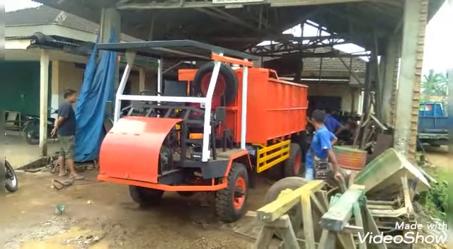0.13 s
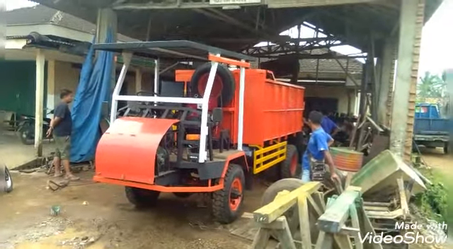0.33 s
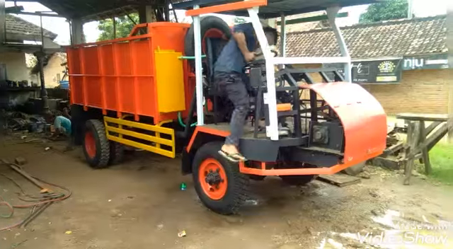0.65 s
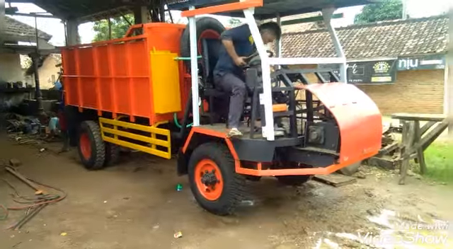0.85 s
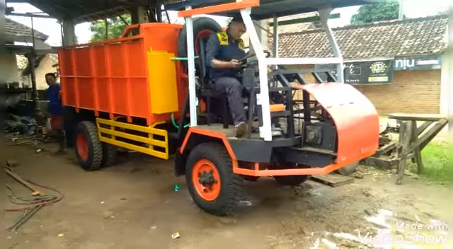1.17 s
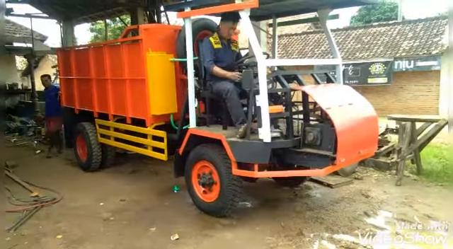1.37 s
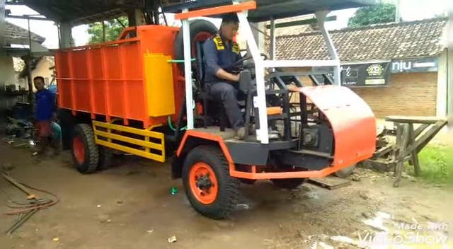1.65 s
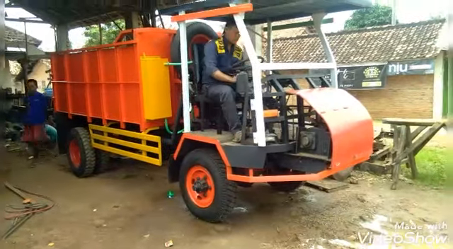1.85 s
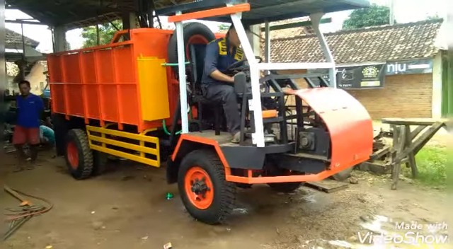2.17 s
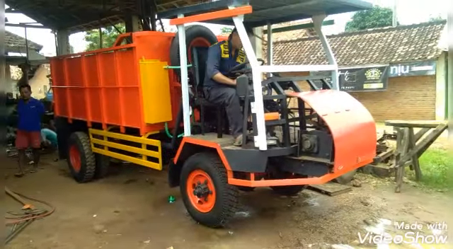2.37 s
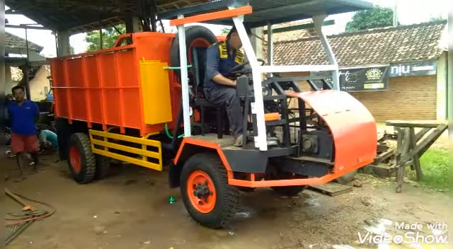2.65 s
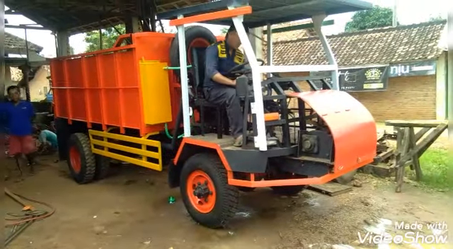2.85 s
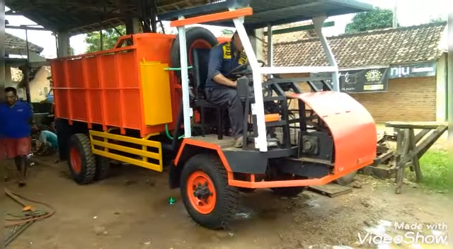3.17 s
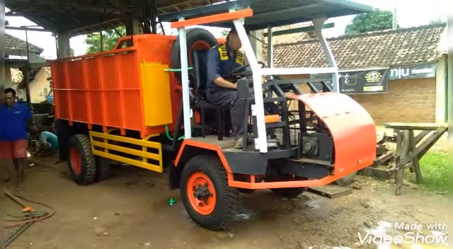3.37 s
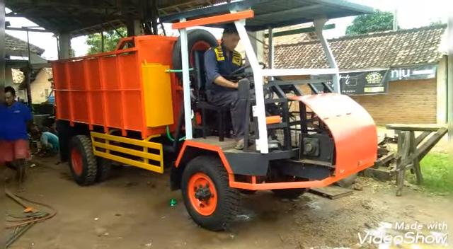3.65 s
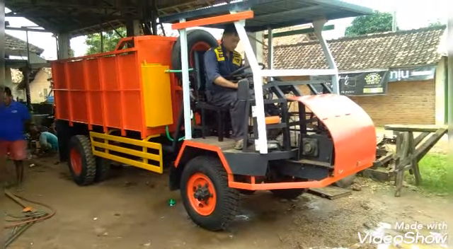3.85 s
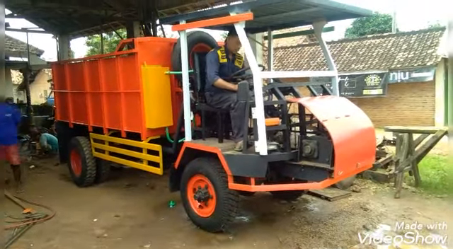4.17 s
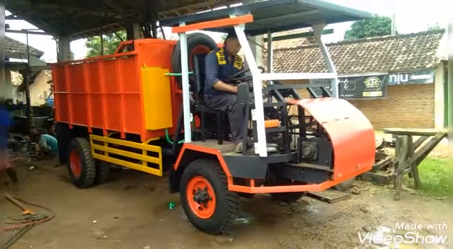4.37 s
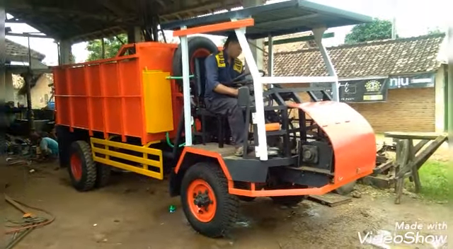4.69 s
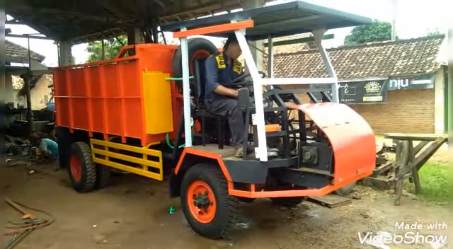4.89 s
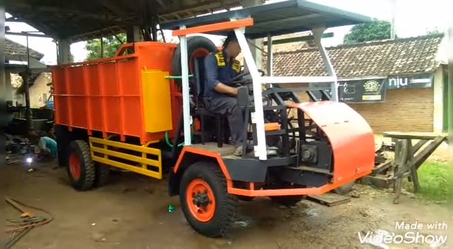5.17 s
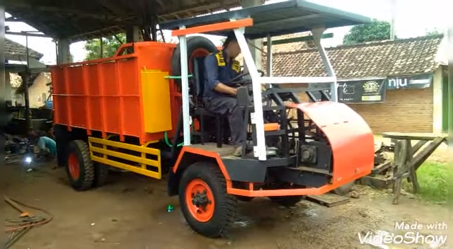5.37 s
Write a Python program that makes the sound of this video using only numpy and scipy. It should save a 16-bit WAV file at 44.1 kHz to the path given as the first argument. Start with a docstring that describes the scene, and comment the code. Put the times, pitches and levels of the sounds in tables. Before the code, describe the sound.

From 0 to 0.47 s, a low, lumpy yard rumble is heard, with dull thuds around 0.06 and 0.11 s and a steel part clanging at 0.16 s, bouncing to about 0.3 s with a rough crash and short ring. It fades quickly into complete silence until about 1.0 s. A small diesel engine then fades in, chugging softly and unevenly at about 31-35 firings per second, with very faint metallic ticks and a faint hiss. From 2 s it speeds up with small surges; after 2.5 s the exhaust bark hardens and clatter grows, reaching a loud, knocking roar at about 53 firings per second near 4.65 s. Grainy rattles come at 4.05, 4.6 and 4.75 s. The pedal lifts at 4.77 s: the bark collapses and the engine coasts down in a hollow pipe hum with fine ticking. Near 5.45 s a sharper metal rattle rings as it nears idle. The sound is thin, with short workshop reflections.

```python
"""Small diesel truck in an open workshop

Two scenes. First a short yard rumble (shaped noise) with dull thuds and one clang of steel (dying sines
with a noise crash), fading to silence. Then the engine fades in at idle, is revved up under a hardening
exhaust bark, coasts back and settles. Every firing sends a pulse down the pipe and knocks the block;
loose metal rattles at set times as short grainy noise bursts, with one slow hiss swell.
"""
import sys
import numpy as np
from scipy import signal
from scipy.fft import rfft, irfft
from scipy.io import wavfile
from scipy.ndimage import uniform_filter1d

SR = 44100
rng = np.random.default_rng(int(sys.argv[2]) if len(sys.argv) > 2 else 0)


def dump_mix(stems):
    """Bounce the given channels to the path in sys.argv[1] as a 16-bit WAV at rate SR."""
    frames = np.atleast_2d(stems).T  # one column per channel
    limited = np.clip(frames, -1, 1)  # hard clip at full scale
    pcm = np.round(limited * 32767).astype(np.int16)
    wavfile.write(sys.argv[1], SR, pcm)


N = 243873
T = np.arange(N) / SR  # time/s


def amp(db):
    """Level law: decibels to amplitude gain."""
    return 10 ** (np.asarray(db) / 20)


def evened(x, size=0):
    """Power normalisation: rms 1 overall, or by a running mean power over size samples, taken twice."""
    if size:
        power = uniform_filter1d(uniform_filter1d(x ** 2, size), size)
    else:
        power = np.mean(x ** 2)
    return x / np.sqrt(abs(power) + 1e-12)


def noise(points, tilt_db=0):
    """Spectral shaping: Gaussian noise of rms 1, its spectrum tilted by tilt_db per octave about 4 kHz."""
    octave = np.log2(np.fft.rfftfreq(N, 1 / SR) + 1)
    f, db = np.transpose(points)
    spectrum_db = np.interp(octave, np.log2(f + 1), db)
    gain = amp(spectrum_db + tilt_db * (octave - np.log2(4000)))
    return evened(irfft(rfft(rng.standard_normal(N)) * gain, N))


def ring(modes, rise):
    """Modal decay: each mode is a dying sine; all share a soft start of time constant rise (s)."""
    t = T[:SR // 2]
    sines = sum(amp(db - 60 * t / t60) * np.sin(2 * np.pi * hz * t) for hz, db, t60 in modes)
    return (1 - np.exp(-t / rise)) * sines


def played(train, shape, early):
    """Convolution: one copy of shape for each impulse, starting early (s) before it."""
    return signal.oaconvolve(train, shape)[round(early * SR):][:N]


def shed(x, t60, delay):
    """Reverberation of roof and walls: sparse reflections of random sign, dying away exponentially."""
    t = T[:SR // 5]
    signs = rng.choice([-1., 1.], len(t))
    present = rng.random(len(t)) < 1500 / SR  # 1500 taps per s on average
    taps = signs * present * amp(-60 * t / t60) * (t > delay)
    return signal.oaconvolve(x, taps / np.linalg.norm(taps))[:N]


def resonate(x, hz, width):
    """Heterodyne resonance: shift the moving pitch hz to zero, low-pass, shift back; width in Hz."""
    carrier = np.exp(2j * np.pi * np.cumsum(hz) / SR)
    pole = np.exp(-np.pi * width / SR)
    return (carrier * signal.lfilter([1], [1, -pole], x / carrier)).real


def pings(at, low_hz, span, decay, spread_db):
    """Impact resonance: a few cycles per firing; pitch drifts as other parts take the blow."""
    out, t = np.zeros(N + 400), T[:400]
    size, jump, drift = rng.random((len(at), 3)).T
    slow = evened(uniform_filter1d(drift - .5, 7))
    pitch = np.clip(.5 + 0.236 * slow + .5 * (jump - .5), 0, 1)
    envelope = (1 - np.exp(-t / .0004)) * np.exp(-t / decay)
    for n, gain, hz in zip(at, amp(spread_db * size), low_hz * span ** pitch):
        out[n:n + 400] += gain * envelope * np.sin(2 * np.pi * hz * t)
    return evened(out[:N], size=8000)


def steel_clang(at_level):
    """Modal impact: a steel part is struck and bounces; each bounce stops the ring before it."""
    # blows: t/s, ring level/dB, crash level/dB
    blows = [(.158, -22.5, -16.5), (0.196, -18, -18), (0.255, -21.5, -29), (0.307, -27.5, -36)]
    # modes of the steel: f/Hz, relative level/dB, t60/s
    steel_modes = [(898, -19, 0.58), (1165, -5.5, 1), (1249, 3, 0.2), (1470, -8, .3), (1620, -12, .2),
                   (1740, -7, .15), (1980, -12, 0.16), (2706, -18.5, 0.41), (2990, -21, .4),
                   (3800, -25.5, 0.46)]
    # crash spectrum: f/Hz, relative level/dB per Hz
    crash_spectrum = [(290, -50.5), (500, -18.5), (827, -23.5), (1240, -5), (1370, -12.5), (1990, -12.5),
                      (3590, -27.5), (8510, -41.5), (15600, -63)]
    steel, t = np.zeros(N), T[:SR // 2]
    hiss = noise(crash_spectrum)
    for s, ring_db, crash_db in blows:
        at = round(s * SR)
        crash = amp(crash_db - 60 * t / 0.45) * hiss[at:at + len(t)]
        steel[at:at + len(t)] = amp(ring_db) * ring(steel_modes, .0004) + crash  # replaces the last ring
    return at_level * steel


def thuds():
    """Heavily damped mode: dull steps or bumps as short low sines, starting with a negative swing."""
    # thuds: t/s, level/dB
    thud_times = [(.056, -22), (.11, -25), (.118, -20.5)]
    out = np.zeros(N)
    for s, db in thud_times:
        out[round(s * SR):][:SR // 2] -= ring([(205, db, 0.02)], .0005)
    return out


def yard():
    """Superposition: lumpy broadband rumble of the workshop, the clang and the thuds."""
    # rumble spectrum: f/Hz, relative level/dB per Hz
    yard_spectrum = [(18, -64.5), (30, -20.5), (97, 3), (182, -16), (256, -4), (360, -15.5), (675, -17),
                     (1110, -15.5), (2310, -20.5), (4000, -38), (8540, -44), (11000, -53.5), (15600, -71.5)]
    # rumble level: t/s, level/dB
    yard_level = [(0, -31.5), (.15, -35), (.3, -34), (.4, -33), (.44, -44), (.46, -52.5), (.468, -77)]
    lumps = evened(uniform_filter1d(rng.standard_normal(N), 900))
    level_db = np.interp(T, *np.transpose(yard_level))
    rumble = amp(level_db + 0.5 * lumps) * noise(yard_spectrum)
    clang = steel_clang(amp(level_db - yard_level[0][1]))  # fades along with the rumble
    return rumble + clang + thuds()


def rattles():
    """Decaying noise: short grainy bursts of loose metal at set times, with one slow hiss swell."""
    # bursts: t/s, level/dB, rise time constant/s, t60/s, spectral tilt/dB per octave
    bursts = [(1.275, -53, 0.0025, 0.17, 6), (1.39, -46, 0.0089, 0.15, 6), (1.52, -56, .08, 1.2, 8),
              (1.59, -53, .002, .1, 6), (1.63, -51, .002, .1, 5), (1.72, -50, 0.0026, .1, 8),
              (1.8, -50, .002, 0.13, 7), (1.85, -51, .01, .35, 8), (4.045, -25.5, 0.0065, 0.55, 1.5),
              (4.625, -24.5, 0.002, 0.23, 2), (4.74, -28.5, 0.0016, 0.25, 5), (5.435, -28, 0.0096, 0.35, 3),
              (5.467, -18.5, 0.0036, 0.49, -7.5), (5.45, -20, 0.0066, 0.26, 3.5)]
    # burst spectrum before the tilt: f/Hz, relative level/dB per Hz
    rattle_spectrum = [(350, -40), (600, -5), (855, 2), (1240, -4), (2070, 0), (2250, -1), (4760, -8),
                       (5460, -15), (8550, -15), (15600, -48)]
    # parts left ringing: f/Hz, level/dB, t60/s
    loose_parts = [(860, -20.5, 0.2), (4680, -22, 0.095), (6440, -43, .1), (8500, -42, 0.2),
                   (13630, -44, 0.16)]
    out = np.zeros(N)
    for s, db, rise, t60, tilt_db in bursts:
        t = np.maximum(T - s, 0)
        out += amp(db - 60 * t / t60) * (1 - np.exp(-t / rise)) * noise(rattle_spectrum, tilt_db)
    hit = round(bursts[-1][0] * SR)  # the burst listed last, at 5.45 s, leaves a few parts ringing
    out[hit:] += ring(loose_parts, 0.0024)[:N - hit]
    return out


def firings():
    """Phase integration of engine speed: speed (firings per s), phase (firings) and firing samples."""
    # engine speed: t/s, firing rate f/Hz
    speed_curve = [(1.0, 30.67), (1.12, 33.69), (1.5, 32.13), (1.6, 34.73), (1.69, 31.62), (1.98, 34.25),
                   (2.32, 40.72), (2.57, 38.02), (2.7, 44.06), (2.81, 37.83), (2.94, 41.42), (3.3, 43.14),
                   (4.05, 49.24), (4.65, 53.42), (4.77, 52.28), (4.81, 49.84), (5.15, 42.8), (5.28, 37.3),
                   (5.38, 38.33), (5.53, 33.63)]
    speed = np.interp(T, *np.transpose(speed_curve))
    phase = np.cumsum(speed * (T >= 1)) / SR - .4
    at = np.flatnonzero(np.diff(np.floor(phase))) + 1
    return speed, phase, at


def controls(speed):
    """Load dependence: levels of the engine layers from effort, speed and pedal."""
    # how hard the engine works: t/s, clatter level/dB, exhaust crack level/dB
    effort = [(1.02, -69, -72), (1.07, -58, -71.5), (1.2, -49.5, -70), (1.62, -47, -68), (1.78, -49, -60),
              (1.88, -45.5, -56), (2.0, -48.5, -60), (2.16, -48.5, -71), (2.45, -45, -41.5),
              (3.08, -40.5, -32), (3.4, -35.5, -25.5), (3.94, -30.5, -22), (4.3, -27.5, -20.5),
              (4.76, -26.5, -22), (4.82, -33.5, -30), (4.9, -33.5, -37), (5.15, -35.5, -50),
              (5.45, -36.5, -50)]
    # Voice under power: firing rate f/Hz, then boom, pipe ring, body ring (level/dB over the clatter),
    # gain of the clatter's treble/dB, whoosh (level/dB over the clatter),
    # valve tick (level/dB against the clatter before its treble gain)
    pulling = [(34.1, 7, 14, -1, -6, -10, -50), (38.1, 5, 10, 12, -7, -11, -45),
               (41.6, 13.6, 5.5, 9.5, -3.5, -10.5, -40), (43.8, 7.6, 8, 7.5, -3, -5, -43),
               (46.5, 14.2, 3, 6, -3.5, -7.5, -42), (47.9, 13.7, 9.5, 7.5, -4, -5.5, -38),
               (49.65, 7.9, -16, 9, -4.5, -1, -38), (50.9, 12.7, -14, 7.5, -12, -8.5, -36),
               (52.5, 9, -21, 7.5, -9.5, -2.5, -32)]
    # voice with the pedal let go: the same columns
    coasting = [(37.7, 10, 14.4, 10.6, -5, -2.5, -24), (40.8, 8, 14, 7.1, -3.5, 1, -22),
                (42.7, 4, 19.7, 7.1, -8, 1, -30), (48, 5, 17.8, 9.4, 1, -1, -42)]
    lift_s, shut_s = 4.77, 0.045  # the pedal is let go; time for the fuel to fall away
    s, *levels = np.transpose(effort)
    clatter_db, crack_db = (np.interp(T, s, c) for c in levels)
    shut = np.clip((T - lift_s) / shut_s, 0, 1)
    rates, *columns = np.transpose(pulling)
    pull = np.array([np.interp(speed, rates, c) for c in columns])
    rates, *columns = np.transpose(coasting)
    coast = np.array([np.interp(speed, rates, c) for c in columns])
    boom, pipe, body, treble_db, whoosh, tick_db = (1 - shut) * pull + shut * coast
    # the share of knock in the clatter grows with the crack; no fuel, little knock
    knock = np.clip(.022 * (crack_db + 45) * (1 - shut), .05, 1)
    return (clatter_db + boom, clatter_db + pipe, clatter_db + body, crack_db, clatter_db, treble_db,
            knock, clatter_db + whoosh, tick_db)


def frame_rumble(pipe_db, body_db, idling):
    """Forced vibration: low noise following pipe and body; at idle a little stronger beside them."""
    # rumble spectrum: f/Hz, relative level/dB per Hz
    rumble_spectrum = [(20, -7), (32, 30), (60, 30), (90, 2), (160, 23), (300, 21), (600, -25), (1200, -37),
                       (2000, -46.5)]
    return amp(.5 * (pipe_db + body_db) - 8 + 2 * idling) * noise(rumble_spectrum)


def whoosh_noise():
    """Broadband noise of rms 1 weighted below about 2.7 kHz."""
    # whoosh spectrum: f/Hz, relative level/dB per Hz
    whoosh_spectrum = [(500, -13), (1000, -4), (2000, -2.5), (2650, -9.5), (2900, -38), (5000, -35)]
    return noise(whoosh_spectrum)


def exhaust_roar(throb):
    """Amplitude modulation: mid-band noise throbbing at the firing rate."""
    return throb * noise([(200, -30), (450, 0), (1300, -3), (2000, -25), (4000, -50)])


def boom_tone(phase, at, strokes):
    """Engine-order tone: the second order of the firing; no two strokes push alike."""
    tone = -np.sqrt(2) * np.cos(4 * np.pi * phase)
    return tone * amp(1.5 * np.interp(T, at / SR, strokes))


def body_ring(blow_train):
    """Structural modes: each firing rings the body, and the workshop answers."""
    # body modes: f/Hz, relative level/dB, t60/s
    body_modes = [(259, 4.5, 0.026), (333, 8, 0.017), (410, -3.5, 0.019)]
    rings = played(blow_train, ring(body_modes, 0.00032), 0.0025)
    rings = rings + amp(-2) * shed(rings, t60=1.0, delay=.004)
    return evened(rings, size=8000)


def pipe_ring(pulse_train, blow_train, idling):
    """Pipe resonance: gas pulses and turbulence excite a moving mode, beside steady silencer modes."""
    # pitch of the moving mode: t/s, f/Hz
    pipe_pitch = [(1, 159), (1.4, 149.4), (1.62, 122), (1.78, 120), (1.9, 172), (2.04, 138), (2.5, 163),
                  (3.1, 137), (4.8, 156), (5.17, 132), (5.26, 181), (5.53, 164)]
    # steady rings of the silencer: f/Hz, relative level/dB, t60/s
    silencer_modes = [(106, -2, 0.076), (187.3, -1, 0.13)]
    pipe_hz = np.interp(T, *np.transpose(pipe_pitch))
    flutter = evened(resonate(rng.standard_normal(N), pipe_hz, width=30))  # turbulence in the slow gas
    soft = played(pulse_train, -np.hanning(130), 0.0018)  # inside the pipe the pulse has no sharp front
    thump = resonate(soft, pipe_hz, width=38)
    # the pipe mouth radiates little below its ring
    open_end = signal.butter(2, 80, "high", fs=SR, output="sos")
    thump = evened(signal.sosfiltfilt(open_end, thump), size=8000)
    silencer = evened(played(blow_train, -ring(silencer_modes, 0.00063), 0.0031))
    return evened(thump + .2 * idling * flutter + 0.67 * silencer, size=8000)


def knocks(at, bright):
    """Combustion knock: the block rings briefly inside a puff of noise."""
    # knock spectrum: f/Hz, relative level/dB per Hz
    knock_spectrum = [(1500, -40), (2500, 5), (3700, 7), (5400, -18), (8000, 4.5), (12000, -12.5),
                      (15600, -44)]
    # hard knock at top speed: f/Hz, relative level/dB per Hz
    snap_spectrum = [(1500, -16), (2500, 6), (4000, -7), (6500, 0), (10000, -17), (15600, -16)]
    train, t = np.zeros(N), T[:400]
    train[at] = amp(7 * rng.random(len(at)))
    puff_shape = (1 - np.exp(-t / 0.00089)) * np.exp(-t / 0.0025)
    puff = signal.oaconvolve(train, puff_shape)[:N]
    puff = puff * (noise(knock_spectrum) + bright * noise(snap_spectrum))
    block = pings(at, low_hz=2560, span=1.7, decay=.003, spread_db=9)
    return evened(evened(puff) + .85 * block, size=8000)


def engine_clatter(speed, at, throb, knock, treble_db, tick_db):
    """Mechanical impact noise: throbbing noise, combustion knock and valve tick, with a treble gain."""
    # clatter spectrum: f/Hz, relative level/dB per Hz
    clatter_spectrum = [(290, -2.5), (500, -1), (553, -8), (716, -0.5), (1090, -7), (1410, -10.5),
                        (2730, -7.5), (5610, -20.5), (8040, -16), (9280, -17.5), (11900, -39), (14900, -52),
                        (15600, -48)]
    # valve tick: firing rate f/Hz, lowest tick f/Hz
    tick_pitch = [(37, 12800), (44, 10800), (52, 11800)]
    firing_rate = SR / np.gradient(at)
    hardness = np.interp(firing_rate, [49, 53.5], [0, .9])  # the knock hardens at top speed
    bright = np.interp(T, at / SR, hardness)
    steady = np.sqrt(1 - np.clip(knock, 0, 1) ** 2) * throb * noise(clatter_spectrum)
    tick_hz = np.interp(speed[at], *np.transpose(tick_pitch))
    tick = pings(at, tick_hz, span=1.13, decay=.0008, spread_db=10)
    clatter = steady + knock * knocks(at, bright) + amp(tick_db) * tick
    treble = signal.sosfiltfilt(signal.butter(2, 5500, "high", fs=SR, output="sos"), clatter)
    return clatter + (amp(treble_db) - 1) * treble


def exhaust_crack(pulse_train):
    """Blow-down pulse: steep over-pressure, then suction, with ground and workshop reflections."""
    t = T[:500]
    front = np.exp(-t / 0.00036) * np.cos(2 * np.pi * 420 * t)
    front = signal.sosfilt(signal.cheby1(6, 3, 1450, fs=SR, output="sos"), front)
    front += amp(-11) * np.roll(front, round(.0062 * SR))  # thrown back by the ground
    crack = played(pulse_train, front, 0.002085)
    crack = crack + amp(-7) * shed(crack, t60=.25, delay=.004)
    return evened(crack, size=8000)


def engine():
    """Periodic excitation: the firing train drives exhaust, pipe, body, knock and clatter."""
    speed, phase, at = firings()
    (boom_db, pipe_db, body_db, crack_db, clatter_db, treble_db,
     knock, whoosh_db, tick_db) = controls(speed)
    uneven_db = np.interp(np.gradient(at) / SR, [.026, .03], [1, 2.3])  # slow firings differ most
    idling = np.interp(T, at / SR, uneven_db)
    chance = rng.standard_normal((len(at), 2))
    pulse_train, blow_train = np.zeros((2, N + SR // 10))
    pulse_train[at], blow_train[at] = amp(uneven_db * chance.T)
    throb = 1 + 0.13 * np.cos(2 * np.pi * (phase - .1))

    out = frame_rumble(pipe_db, body_db, idling)
    out += amp(whoosh_db) * whoosh_noise()
    out += amp(crack_db - 12) * exhaust_roar(throb)
    out += amp(boom_db) * boom_tone(phase, at, chance[:, 1])
    out += amp(body_db) * body_ring(blow_train)
    out += amp(pipe_db) * pipe_ring(pulse_train, blow_train, idling)
    out += amp(clatter_db) * engine_clatter(speed, at, throb, knock, treble_db, tick_db)
    out += amp(crack_db) * exhaust_crack(pulse_train)
    return out


def scene():
    """Time gating: the yard, then the engine with its rattles, with silence between them."""
    yard_end_s, engine_start_s = .468, 1.021
    first = yard() * (T < yard_end_s)
    second = (engine() + rattles()) * (T > engine_start_s)
    return (first + second)[None]


def record(dry):
    """Band limitation: the small microphone drops the deep bass; the recorder cuts the top."""
    mic_low_hz, edge_hz = 75, 15750
    high_pass = signal.butter(2, mic_low_hz, "high", fs=SR, output="sos")
    thin = signal.sosfiltfilt(high_pass, dry) * (dry != 0)  # the silence stays silent
    low_pass = signal.firwin(511, edge_hz, window=("kaiser", 9), fs=SR)
    return signal.oaconvolve(thin, low_pass[None], "same")


dry = scene()
out = record(dry)
dump_mix(out)
```